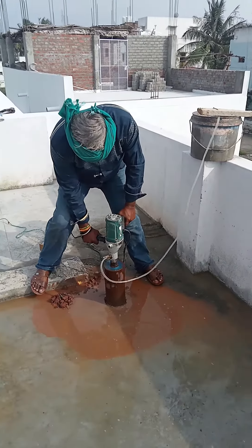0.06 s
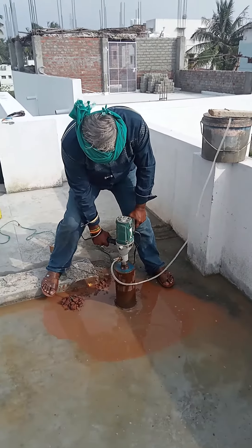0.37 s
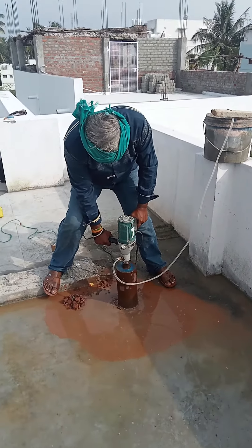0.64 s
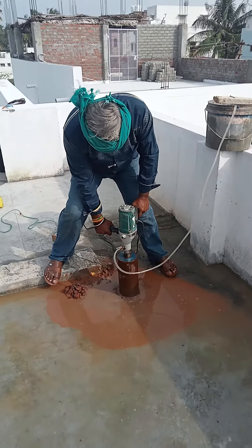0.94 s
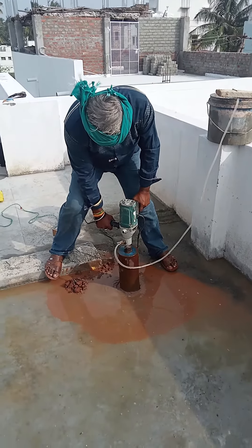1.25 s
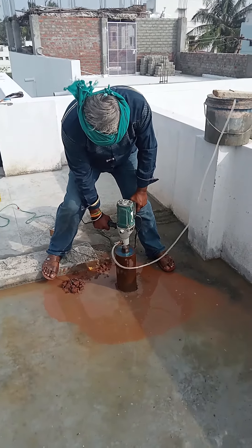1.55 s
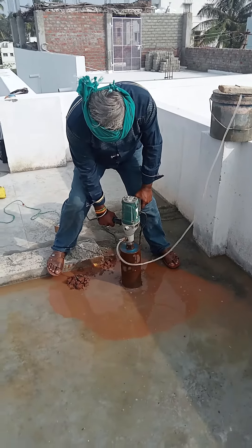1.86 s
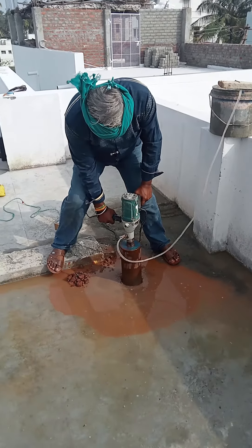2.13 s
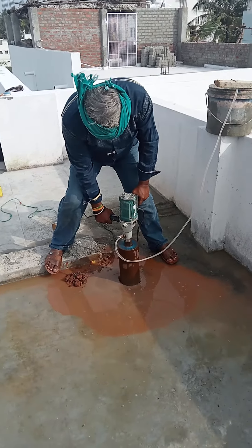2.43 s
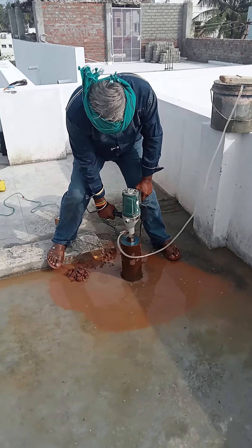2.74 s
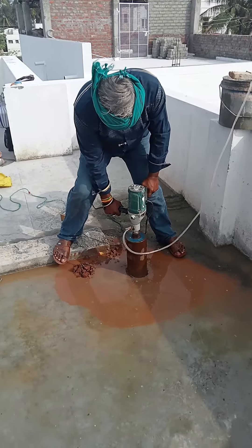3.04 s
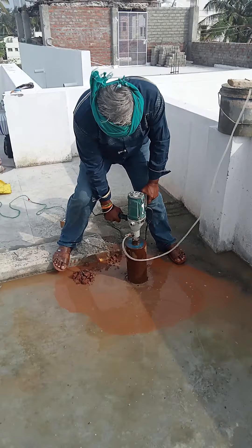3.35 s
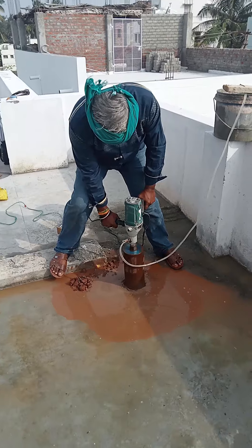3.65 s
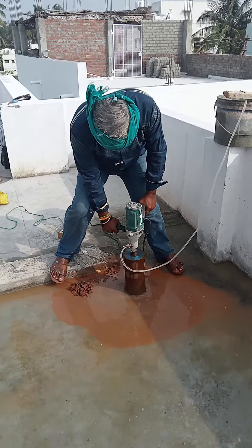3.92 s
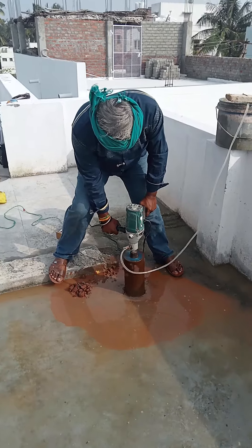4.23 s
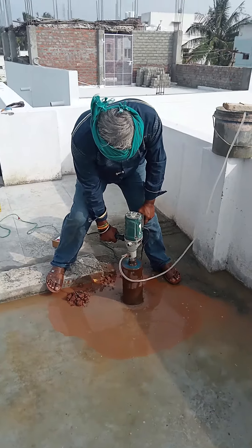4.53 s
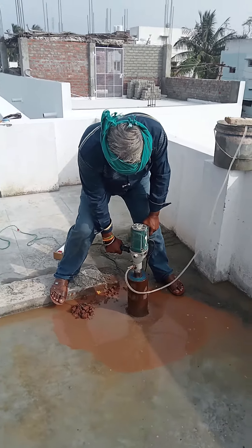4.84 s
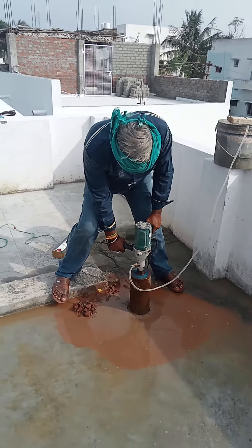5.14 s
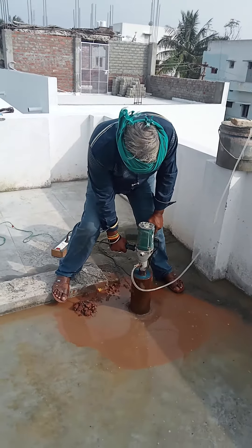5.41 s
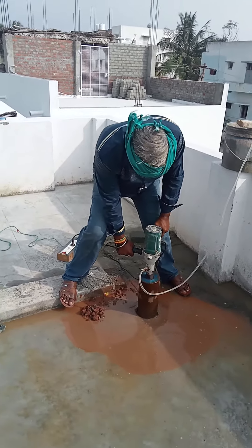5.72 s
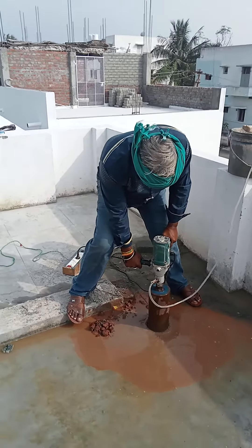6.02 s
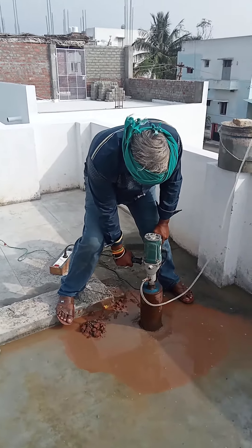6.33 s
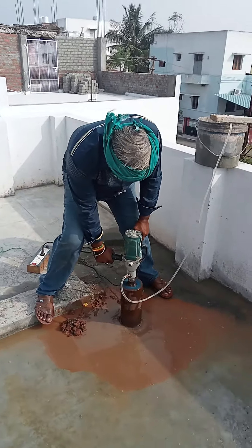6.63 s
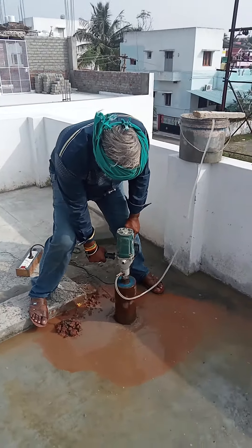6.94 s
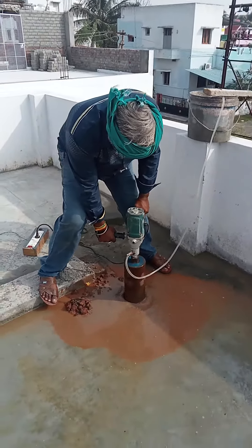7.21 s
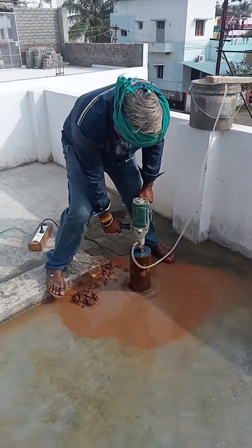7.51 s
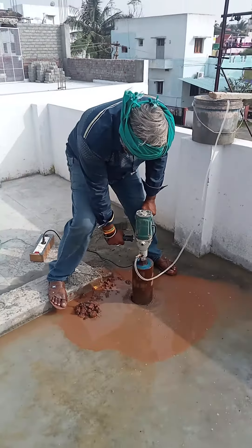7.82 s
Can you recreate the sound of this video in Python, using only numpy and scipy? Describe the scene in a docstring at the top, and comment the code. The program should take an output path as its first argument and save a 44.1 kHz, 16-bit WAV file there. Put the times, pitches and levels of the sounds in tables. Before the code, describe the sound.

Bright, hissing grinding runs without a break as an electric drill drives a steel tube into a wet concrete slab a few steps away. Underneath, the motor's whine wavers with the load, dipping after a few quick catches on stones. Rough, high squeals then come and go as the tube rubs in its slot, along with soft wind thumps on the microphone. Nearby walls add faint reflections to the open air.

```python
"""A hand-held electric core drill is grinding into a wet concrete roof slab, a few steps away. From the
start, grit cracking under the teeth rings the steel tube of the bit and throbs with each turn, while the
motor whines and blows beneath it and parapet walls answer. The teeth catch on stones, three in a row
just after 2 s, and the motor sags. From about 3 s to 7 s the tube squeals on and off in its slot and
puffs of wind touch the microphone. The grinding carries on to the end."""
import sys
import numpy as np
from scipy import signal
from scipy.fft import rfft, irfft, next_fast_len
from scipy.io import wavfile
from scipy.ndimage import uniform_filter1d, map_coordinates

SR = 44100
rng = np.random.default_rng(int(sys.argv[2]) if len(sys.argv) > 2 else 0)


def bounce(signal):
    """Save signal as a 16-bit WAV file at the path given by the first command-line argument."""
    frames = np.transpose(np.atleast_2d(signal))
    limited = np.clip(frames, -1, 1)
    pcm = np.round(limited * 32767).astype(np.int16)
    wavfile.write(sys.argv[1], SR, pcm)


N = 351477

# how hard the teeth cut, before trims: (time [s], tube ring [dB], fine fizz [dB], scrape [dB])
CUT_LEVELS = [(0.0, -20, -31, -25.5), (0.04, -21, -33.5, -24.5), (1.06, -19, -28, -25),
              (1.31, -17.5, -29, -22.5), (1.66, -16.5, -26.5, -24), (1.8, -20.5, -29, -25.5),
              (2.2, -19, -29, -23.5), (2.51, -21.5, -33.5, -26), (3.62, -17.5, -26, -24.5),
              (3.66, -18, -28.5, -24), (4.73, -17.5, -27.5, -24), (5.61, -18.5, -30.5, -24),
              (5.9, -23, -33.5, -25.5), (6.06, -20.5, -32, -22), (6.37, -19, -32, -24),
              (6.57, -24.5, -33.5, -25.5), (7.01, -21, -30.5, -25), (7.97, -25.5, -34, -24.5)]
RING_TRIM_DB, FIZZ_TRIM_DB, SCRAPE_TRIM_DB = 0.37, 1.7, 1.5
# teeth catching on stones: (time [s], relative peak [dB])
STONE_CATCHES = [(0.664, -3), (2.014, -1), (2.142, -0.5), (2.229, -1), (2.866, -5), (3.509, -2),
                 (5.659, -6), (5.739, 1), (5.751, -11), (6.069, -6), (7.104, -4), (7.2, -6)]
# bright modes of the steel tube: (frequency [Hz], width [Hz], level [dB])
TUBE_MODES = [(6693, 420, -8), (7030, 310, -1.5), (7216, 277, -2.5), (7855, 700, -14)]
# EQ on the tube's ring: (frequency [Hz], gain [dB])
TUBE_EQ = [(2500, -30), (6000, -3.5), (7000, -1.0), (8000, -2.5), (11000, -6)]
# low, middle and high mode of the wet bit: (frequency [Hz], width [Hz], trim [dB])
BARREL_MODES = [(3490, 690, -1), (4228, 550, -0.5), (5820, 750, -1)]
LOW_MODE_DB, MIDDLE_MODE_DB = -9, -7  # relative to the scrape curve
# contour of the high mode, of which only the swing counts: (time [s], level [dB])
HIGH_MODE_CONTOUR = [(0.0, -28), (0.13, -34), (0.77, -31), (1.57, -25), (1.69, -25.5), (4.24, -28),
                     (5.64, -25.5), (6.73, -32), (6.81, -26), (7.81, -26), (7.9, -29), (7.97, -26)]
HIGH_MODE_DB, HIGH_MODE_SWING = -28, 1.86  # base level; dB per dB of contour
# colour of the scrape: (frequency [Hz], density [dB])
SCRAPE_SPECTRUM = [(600, -43), (2700, -18), (3200, -6.5), (4000, -6.5), (4500, -1), (4900, 3), (5250, 4),
                   (5550, -2.5), (6250, 2), (7900, -3.5), (8400, -10.5), (9200, -9), (9800, -17),
                   (16000, -19)]
# colour of the fine fizz on top: (frequency [Hz], density [dB])
FIZZ_SPECTRUM = [(6000, -45), (9000, -8), (11000, -10.5), (12500, -3), (13300, -4), (14200, -0.5),
                 (15000, 7), (15600, -6)]
# the tube rubbing in its slot: (start [s], length [s], first pitch [Hz], last pitch [Hz], level [dB])
SLOT_SQUEALS = [(0.0, 0.28, 4990, 4980, -38), (2.904, 1.2, 4900, 4920, -34),
                (4.299, 0.51, 4870, 4700, -30.5), (5.105, 0.41, 4850, 4920, -30),
                (5.981, 0.033, 4900, 4970, -25), (6.6, 0.22, 4720, 4830, -29.5),
                (6.918, 0.26, 4840, 4870, -28)]

# the motor, sagging under load: (time [s], whine pitch [Hz])
MOTOR_PITCH = [(0, 895), (.15, 920), (.6, 1078), (1.0, 1040), (1.3, 1075), (2.05, 1075), (2.4, 920),
               (2.55, 915), (2.9, 1045), (3.15, 1070), (3.6, 980), (4.3, 965), (4.8, 1060), (5.3, 1000),
               (5.9, 988), (6.3, 1050), (6.8, 1020), (7.97, 1058)]
# fader ride on the whine: (time [s], level [dB])
WHINE_LEVELS = [(0, -57), (.5, -46.5), (1.0, -54), (1.5, -50.5), (2.85, -50), (3.4, -58), (7.4, -58),
                (7.8, -50)]
# fader ride on the whine's octave: (time [s], level [dB])
OCTAVE_LEVELS = [(0, -45), (4.5, -54), (5.0, -49), (5.8, -44), (6.15, -37), (6.4, -45), (7.4, -62),
                 (7.8, -40.5)]
# casing noise contours, of which only the swing counts: (time [s], housing ring [dB], cooling air [dB])
CASING_CONTOURS = [(0.0, -32, -45), (0.04, -38, -38), (0.51, -37, -45), (1.49, -35.5, -40),
                   (3.17, -37, -43), (4.35, -36.5, -40.5), (5.1, -42.5, -40), (6.13, -36.5, -41),
                   (6.35, -40, -43.5), (7.41, -43.5, -42), (7.86, -41, -46), (7.97, -47, -48)]
HOUSING_DB, HOUSING_SWING, AIR_DB, AIR_SWING = -39, 1.48, -36, 0.62  # base level; dB per dB of contour
# modes of the motor housing: (frequency [Hz], width [Hz], level [dB])
HOUSING_MODES = [(1840, 173, -1.5), (1950, 150, 1)]
# EQ on the housing's ring: (frequency [Hz], gain [dB])
HOUSING_EQ = [(900, -27), (1750, -1.5), (2100, 0.5), (2800, -13)]
# colour of the cooling air: (frequency [Hz], density [dB])
AIR_SPECTRUM = [(300, -61), (750, -18.5), (1000, -7), (1300, -8), (1550, -2.5), (1750, -1.5), (2100, -2.5),
                (2330, 2), (2600, -11.5), (3000, -6), (5000, -33)]
# fader ride on the gear rumble: (time [s], level [dB])
GEAR_LEVELS = [(0, -42.5), (.6, -44.5), (1.6, -40.5), (2.4, -45.5), (3.6, -43), (5.4, -44), (5.85, -45.5),
               (6.3, -42), (7.97, -44)]
# colour of the gear rumble: (frequency [Hz], density [dB])
GEAR_SPECTRUM = [(30, -24), (75, -25), (110, -14), (160, -5), (260, -11.5), (400, -3), (510, 0.5),
                 (600, -12), (720, -16), (1500, -32)]

# early reflections off the parapets: (delay [ms], level [dB])
PARAPET_ECHOES = [(6.5, -19), (13, -17), (24, -24.5)]
# wind on the microphone: (start [s], length [s], deep thud [dB], flutter [dB])
WIND_PUFFS = [(2.678, 0.12, -45, -48.5), (2.947, .12, -46, -54), (3.245, 0.053, -50, -42),
              (3.63, 0.16, -42.5, -45.5), (3.785, 0.19, -32.5, -32.5), (4.027, 0.15, -41, -35.5),
              (4.22, 0.12, -36, -26.5), (4.37, .06, -42, -40), (4.593, 0.029, -36, -33),
              (4.778, 0.033, -37, -31), (4.937, 0.036, -35, -39), (5.017, .12, -40.5, -39.5),
              (5.246, .07, -36, -48), (5.38, .05, -42, -35), (5.55, .04, -37, -49),
              (5.775, 0.027, -31.5, -47), (5.876, 0.037, -36, -45), (5.95, .05, -37, -44),
              (6.041, 0.037, -36, -45), (6.12, .03, -38, -51), (6.588, 0.023, -46, -36),
              (7.0, .035, -43, -42)]
# colour of the wind's deep thud: (frequency [Hz], density [dB])
THUD_SPECTRUM = [(15, -45), (32, -32), (65, -3.5), (105, 1.5), (150, 0), (250, -36), (600, -62)]
# colour of the wind's flutter: (frequency [Hz], density [dB])
FLUTTER_SPECTRUM = [(40, -35), (110, -12), (170, 7), (250, 1), (350, -4.5), (550, -16), (1000, -37),
                    (3000, -90)]
BREEZE_DB, BREEZE_SWING_DB = -58, 4.5  # light air between the puffs
TOP_HZ = 15560


def bit(motor_phase):
    """The cutting force, uneven around each turn, rings the steel under a gritty scrape and fizz."""
    ring_db, fizz_db, scrape_db = curves(CUT_LEVELS)
    turn = np.sin(motor_phase / 116 + .5 * wobble(2.92))  # geared down to about nine turns a second
    bite = amp(0.066 * turn + 0.44 * wobble(35) + 0.98 * wobble(400))
    tube = tube_ring(bite, turn, ring_db)
    barrel = barrel_ring(bite, scrape_db)
    coarse_grit = grit(per_second=4000, spread_db=2, scrape_db=-1) * bite
    scrape = amp(scrape_db + SCRAPE_TRIM_DB) * coloured(coarse_grit, SCRAPE_SPECTRUM)
    fine_grit = grit(per_second=6800, spread_db=1, scrape_db=8) * bite
    fizz = amp(fizz_db + FIZZ_TRIM_DB) * coloured(fine_grit, FIZZ_SPECTRUM)
    return tube + patchy(barrel + scrape + fizz, depth_db=2.0)


def tube_ring(bite, turn, ring_db):
    """Cracking grit drives the tube's bright modes, which throb with each turn and flare on stones."""
    force = grit(per_second=5000, spread_db=-1, scrape_db=-0.5) * bite
    ring = coloured(resonate(force, TUBE_MODES), TUBE_EQ)
    ring = patchy(ring, depth_db=0.35) + amp(-4.5) * screech(wander_hz=170.4)
    throb = amp(0.21 * turn + 0.6 * wobble(35) + 0.6 * wobble(13))
    level = np.hypot(amp(ring_db + RING_TRIM_DB), catches(t60_s=0.053, level_db=-9))
    return level * unit(ring * throb)


def grit(per_second, spread_db, scrape_db):
    """Grains crack at random moments over a continuous scrape."""
    cracks = (rng.random(N) < per_second / SR) * np.sign(noise()) * amp(spread_db * noise())
    return unit(unit(cracks) + amp(scrape_db) * noise())


def screech(wander_hz):
    """Stick and slip lock the tube onto its strongest mode: a broken tone that wanders around it."""
    hz = TUBE_MODES[1][0] + wander_hz * wobble(170)
    return unit(np.sin(phase_of(hz)) * amp(2.8 * wobble(300)))


def catches(t60_s, level_db):
    """A tooth meeting a stone gives a short hard burst of force."""
    force, t = np.zeros(N + SR), np.arange(SR // 10) / SR
    for start, db in STONE_CATCHES:
        force[round(start * SR):][:len(t)] += amp(db + level_db - 60 * t / t60_s)
    return force[:N]


def barrel_ring(bite, scrape_db):
    """Three broad modes give the wet bit its body; the lower two follow the scrape."""
    high_db = HIGH_MODE_DB + HIGH_MODE_SWING * swing(curves(HIGH_MODE_CONTOUR)[0])
    levels_db = scrape_db + LOW_MODE_DB, scrape_db + MIDDLE_MODE_DB, high_db
    return sum(amp(db + trim_db + 0.79 * wobble(18)) * band(noise() * bite, hz, width)
               for db, (hz, width, trim_db) in zip(levels_db, BARREL_MODES))


def squeal(unsteady_hz):
    """Now and then the tube wall rubs in its slot and sings a rough, gliding note."""
    t, out = np.arange(N) / SR, np.zeros(N)
    waver, rough = unsteady_hz * wobble(400), amp(3 * wobble(90))
    for start, length, first_hz, last_hz, db in SLOT_SQUEALS:
        hz = np.interp(t, [start, start + length], [first_hz, last_hz]) + waver
        note = unit(np.sin(phase_of(hz)) * rough)
        out += amp(db) * swell(start, length, attack_s=.04, release_s=.06) * note
    return out


def motor(phase):
    """A whine and its octave sit over cooling air, a ringing housing and the rumble of the gears."""
    whine = unit(np.sin(phase + .7 * wobble(45)) * amp(3 * wobble(25)))
    octave = unit(np.sin(2 * phase + 1.5 * wobble(110)) * amp(3.5 * wobble(40)))
    tones = amp(curves(WHINE_LEVELS)[0]) * whine + amp(curves(OCTAVE_LEVELS)[0]) * octave
    housing_db, air_db = map(swing, curves(CASING_CONTOURS))
    air = amp(AIR_DB + AIR_SWING * air_db) * coloured(noise(), AIR_SPECTRUM)
    housing = coloured(resonate(noise(), HOUSING_MODES), HOUSING_EQ)
    housing *= amp(HOUSING_DB + HOUSING_SWING * housing_db)
    gears = unit(coloured(noise(), GEAR_SPECTRUM) * amp(1.7 * wobble(15)))
    gears *= amp(curves(GEAR_LEVELS)[0])
    rattle = amp(wobble(22) + 1.27 * wobble(200))  # play in the gears shakes the casing unevenly
    return tones + patchy((air + housing) * rattle + gears, depth_db=1.5)


def parapets(x, sway_ms):
    """The walls return weak copies whose paths change a little as the hand-held microphone drifts."""
    echoes = np.zeros(N)
    for ms, db in PARAPET_ECHOES:
        delay = (ms + sway_ms * wobble(.8)) * SR / 1000
        echoes += amp(db) * map_coordinates(x, [np.arange(N) - delay], order=3)
    return echoes


def wind():
    """Lumpy puffs thud and flutter on the microphone port over a faint breeze."""
    thud, flutter = np.zeros(N), np.zeros(N)
    for start, length, thud_db, flutter_db in WIND_PUFFS:
        puff = swell(start, length, attack_s=0.011, release_s=0.019)
        thud = np.hypot(thud, amp(thud_db) * puff)
        flutter = np.hypot(flutter, amp(flutter_db) * puff)
    puffs = thud * coloured(noise(), THUD_SPECTRUM) + flutter * coloured(noise(), FLUTTER_SPECTRUM)
    breeze = unit(coloured(noise(), THUD_SPECTRUM) * amp(BREEZE_SWING_DB * wobble(12)))
    return puffs * amp(1.95 * wobble(45)) + amp(BREEZE_DB) * breeze


def amp(db):
    """Decibels to gain."""
    return 10 ** (np.asarray(db) / 20)


def unit(x):
    """Scale to rms 1."""
    return x / np.sqrt(np.mean(x ** 2) + 1e-20)


def noise():
    """White noise."""
    return rng.standard_normal(N)


def phase_of(hz):
    """Running phase of a moving pitch, in radians."""
    return 2 * np.pi * np.cumsum(hz) / SR


def curves(rows):
    """One automation curve for each column after the time."""
    times, *columns = np.transpose(rows)
    return [np.interp(np.arange(N) / SR, times, column) for column in columns]


def swing(db):
    """A level curve around its own mean."""
    return db - db.mean()


def wobble(rate):
    """A smooth random modulator, rate knots a second."""
    return map_coordinates(rng.standard_normal(int(N * rate / SR) + 4), [np.arange(N) * rate / SR])


def swell(start, length, attack_s, release_s):
    """An envelope that reaches 1 at the start, holds for the length and dies away."""
    t = np.arange(N) / SR - start
    return np.exp(np.clip(np.minimum(t / attack_s, (length - t) / release_s), -20, 0))


def filtered(x, response):
    """x through a complex frequency response."""
    size = next_fast_len(N + SR // 2)
    return irfft(rfft(x, size) * response(np.fft.rfftfreq(size, 1 / SR)), size)[:N]


def coloured(x, spectrum):
    """x through an EQ curve drawn on a log frequency axis, at rms 1."""
    hz, db = np.transpose(sorted(spectrum))
    return unit(filtered(x, lambda f: amp(np.interp(np.log(f + 1), np.log(hz + 1), db))))


def resonance(f, hz, width_hz):
    """Response of one damped mode at the frequencies f."""
    return 1j * f * width_hz / (hz * hz - f * f + 1j * f * width_hz)


def resonate(x, modes):
    """x through parallel modes of alternating polarity, at rms 1."""
    return unit(filtered(x, lambda f: sum((-1) ** k * amp(db) * resonance(f, hz, width)
                                          for k, (hz, width, db) in enumerate(modes))))


def band(x, hz, width_hz):
    """x through one resonance with steep skirts, at rms 1."""
    return unit(filtered(x, lambda f: resonance(f, hz, width_hz) ** 2))


def patchy(x, depth_db):
    """Narrow parts of the spectrum flare and fade at random."""
    spectra = signal.stft(x, nperseg=1024)[2]
    flare = uniform_filter1d(rng.standard_normal(spectra.shape), size=6, axis=0)  # smooth in frequency
    flare = uniform_filter1d(flare, size=14, axis=1)  # and in time
    return signal.istft(spectra * amp(depth_db * unit(flare)), nperseg=1024)[1][:N]


def scene():
    """One shaft speed drives motor and bit; drill, echoes and wind mix to mono on both channels."""
    phase = phase_of(curves(MOTOR_PITCH)[0])
    drill = bit(phase) + squeal(unsteady_hz=65) + motor(phase)
    mono = drill + parapets(drill, sway_ms=0.145) + wind()
    return np.array([mono, mono])


def record(dry):
    """A soft clip rounds off the highest peaks, then a brick-wall low-pass cuts at TOP_HZ."""
    rounded = dry / (1 + np.abs(dry / .88) ** 10) ** (1 / 10)
    return np.array([filtered(channel, lambda hz: hz < TOP_HZ) for channel in rounded])


dry = scene()
out = record(dry)
bounce(out)
```